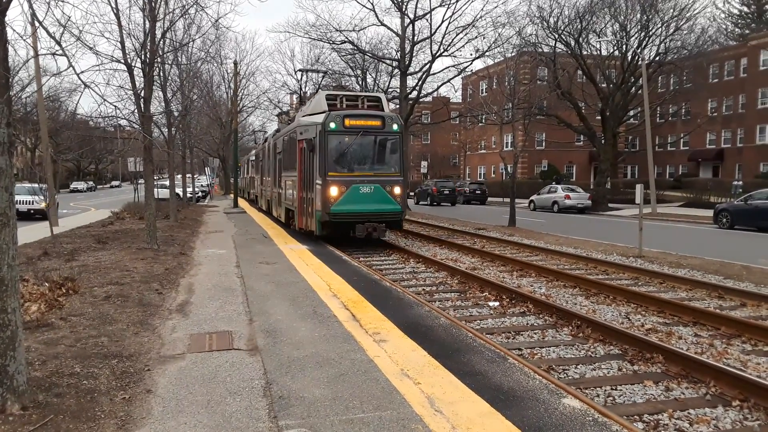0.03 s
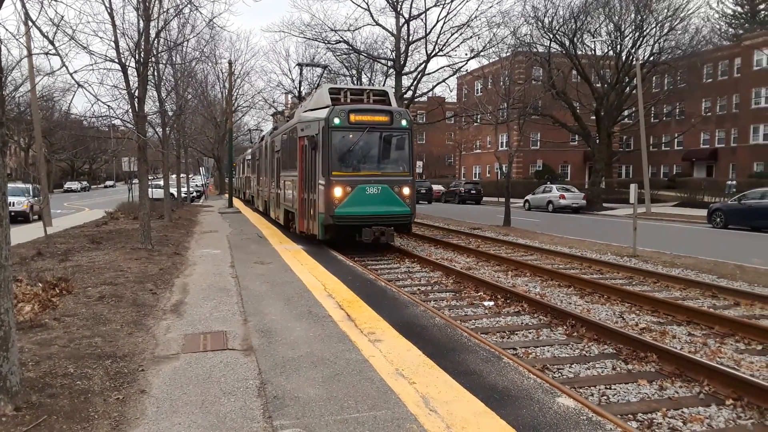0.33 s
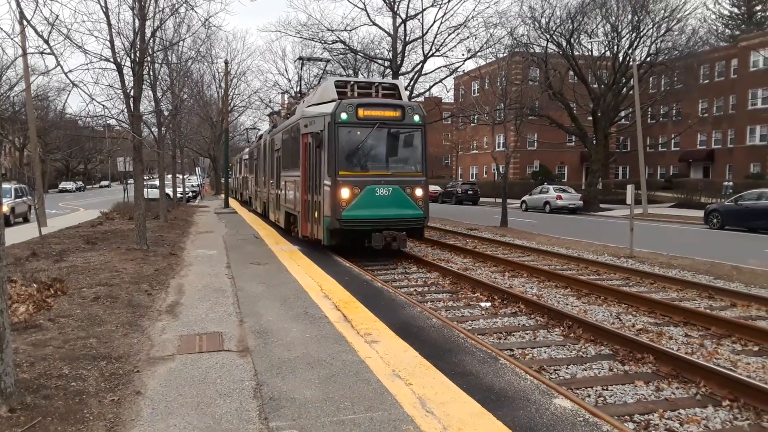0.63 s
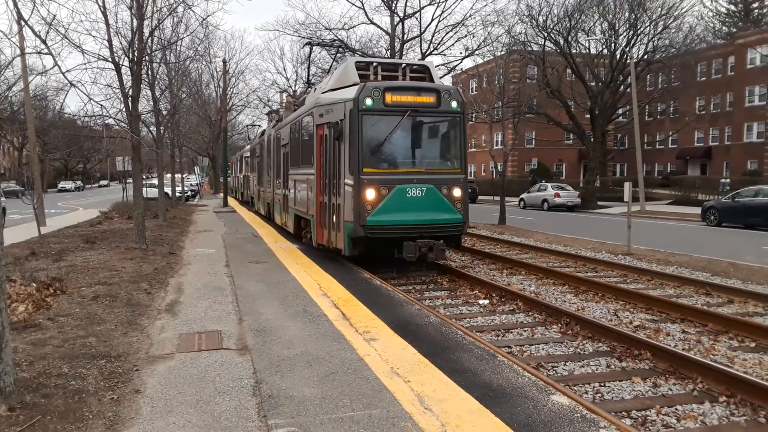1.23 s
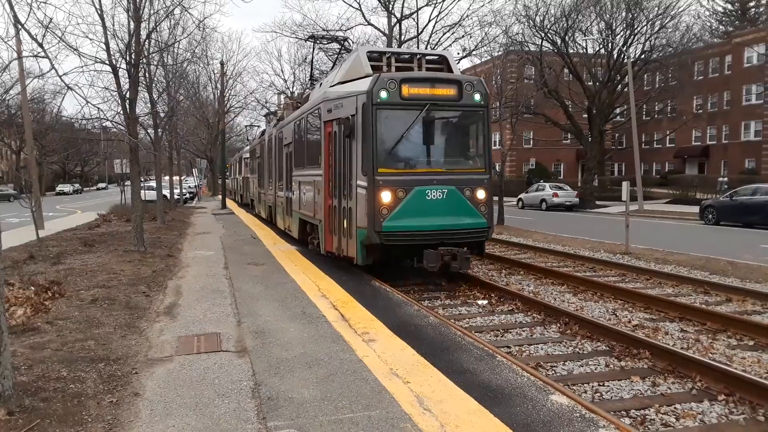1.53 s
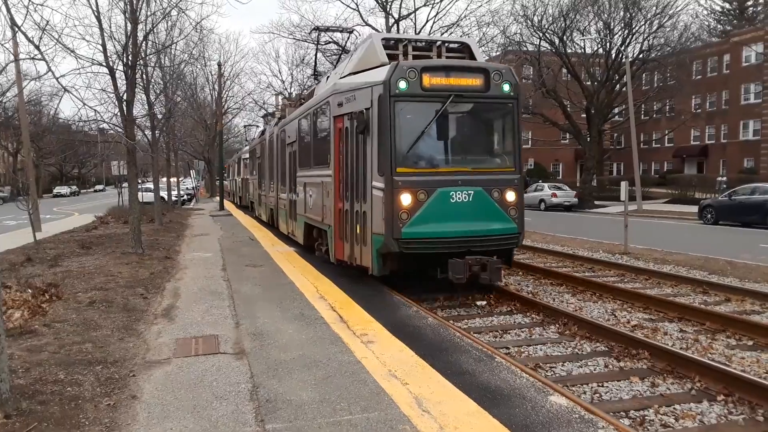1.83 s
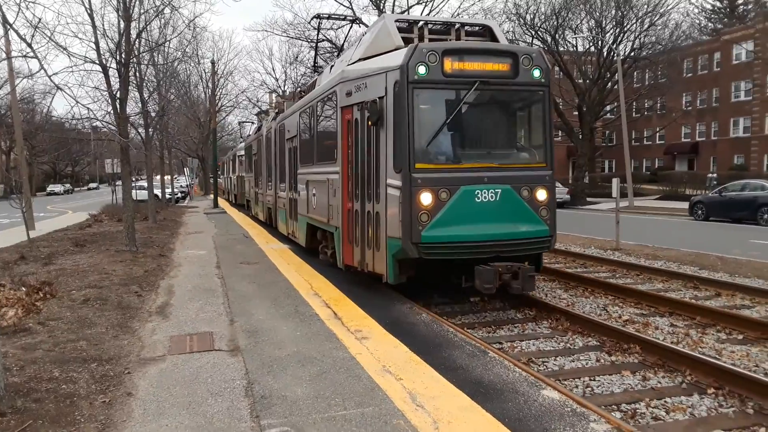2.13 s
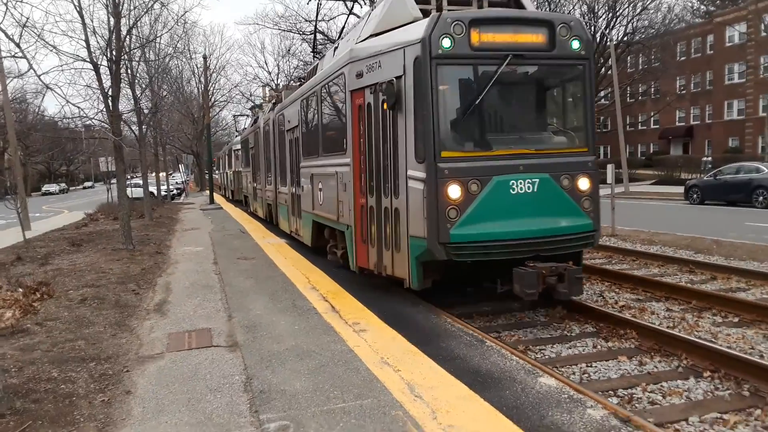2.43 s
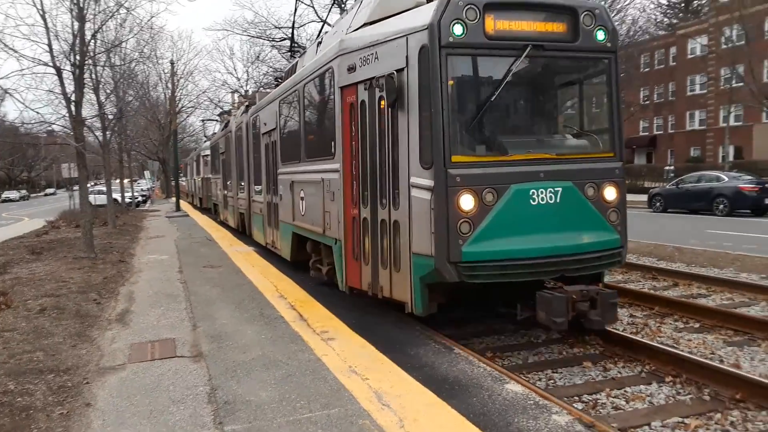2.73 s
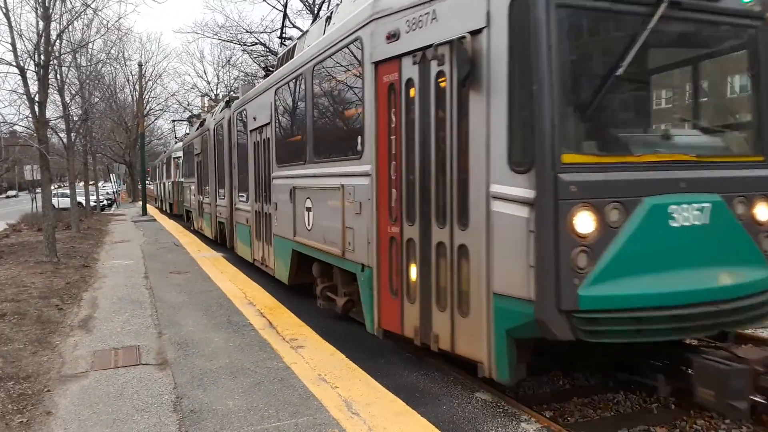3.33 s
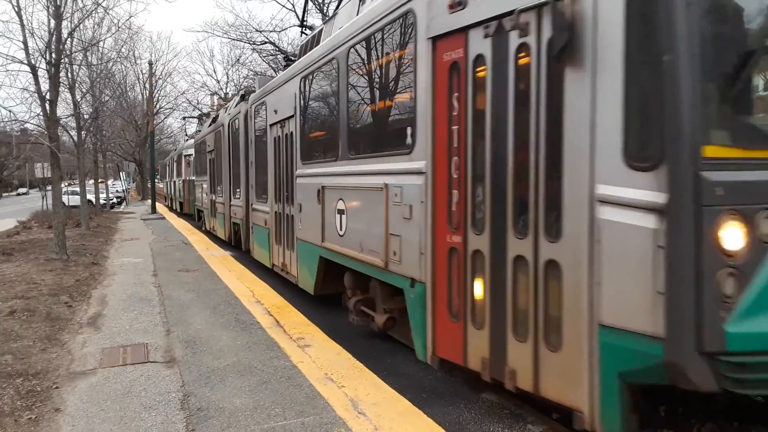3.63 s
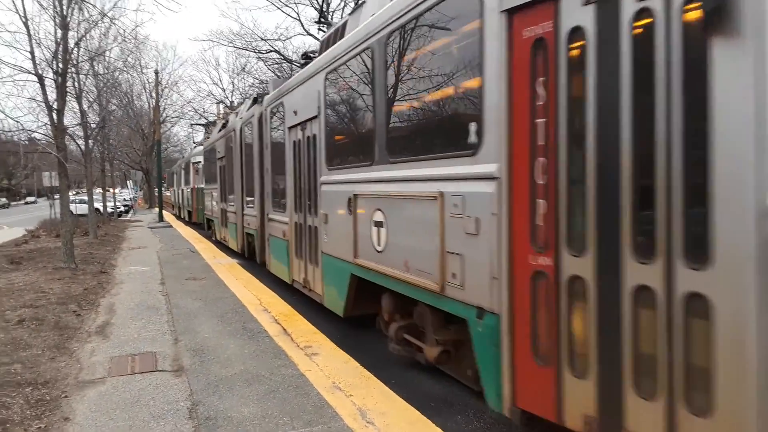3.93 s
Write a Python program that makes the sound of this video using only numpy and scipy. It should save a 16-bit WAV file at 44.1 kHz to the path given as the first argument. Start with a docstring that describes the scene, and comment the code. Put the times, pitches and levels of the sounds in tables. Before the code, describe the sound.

A light-rail train approaches a street platform with a steady low rumble and a high electric whine, while low hums swell and fade. A faint puff of brake air comes at about 0.7 seconds, and a sharper, thin one near 2.9. From about 2 seconds the whine flutters more. Higher whistles and hiss build from 3 to 4 seconds, with two tiny puffs, as the train draws level.

```python
"""Light-rail train drawing level with a platform.

The wheels rumble on a street track; the street's low hums come and go. The traction electronics whine
near 1 kHz, fluttering more and more as echoes beat with the direct tone. Higher whistles and hiss grow
as the train nears; the air brakes let out a few short, thin puffs."""
import sys
import numpy as np
from scipy import signal
from scipy.fft import rfft, irfft
from scipy.io import wavfile
from scipy.ndimage import uniform_filter1d

SR = 44100
rng = np.random.default_rng(int(sys.argv[2]) if len(sys.argv) > 2 else 0)


def generate_wav(signal):
    """Clip the signal to [-1, 1] and save it as 16-bit WAV at the path in sys.argv[1]."""
    frames = np.transpose(np.atleast_2d(signal))
    scaled = np.clip(frames, -1, 1) * 32767
    pcm = np.round(scaled).astype(np.int16)
    wavfile.write(sys.argv[1], SR, pcm)


N = 176400
SPEED_M_S, ABREAST_S, SIDE_M = 7.04, 3.9, 5.484

# Rolling noise density: f/Hz, far level/dB, near level/dB, L-R/dB
ROLLING_SPECTRUM = [(20, -102, -101, 0), (37, -90, -89, -0.5), (52, -61.5, -64, -0.5), (76, -65, -64, 0),
                    (103, -59.5, -58, 0), (170, -55.5, -55.5, 0), (265, -60, -57.5, 0),
                    (420, -65.5, -64, -1), (710, -64.5, -62.5, -1), (1236, -69.5, -68, -3.5),
                    (1740, -73.5, -72.5, -1), (2234, -77.5, -76.5, 1), (2780, -82.5, -80, 3.5),
                    (3350, -87, -83, 6), (3750, -89, -86.5, 6), (3930, -91.5, -85, 5),
                    (4670, -96.5, -91, -1), (5400, -102.5, -95.5, -3.5), (6620, -109, -100, -9),
                    (8260, -122, -116, -1.5), (13000, -119, -113, -3.5)]
# Rolling noise stereo image: f/Hz, L-R correlation
ROLLING_CORRELATION = [(30, 0.95), (150, .96), (290, 0.82), (640, 0.33), (1400, 0.13), (6000, 0.041)]
# Whine pitch: t/s, f/Hz
WHINE_GLIDE = [(0, 1010), (1, 1009.6), (2, 1008.8), (2.9, 1007.6), (3.5, 1007), (4, 1004)]
# Whine strength: t/s, direct level/dB, direct L-R/dB, echo level/dB
WHINE_ENVELOPE = [(0, -34, 3.5, -35.5), (.35, -31.5, 3.5, -34.5), (.7, -30.5, -11.5, -35.5),
                  (1.2, -28.5, -14, -35.5), (1.65, -25, -12, -35.5), (2.1, -25, -15, -34.5),
                  (2.4, -29.5, -1.5, -33), (2.9, -23, -6, -32.5), (2.96, -35, -9, -31),
                  (3.45, -28, -7, -29.5), (3.75, -29, -6, -28.5), (4, -33, -9, -30)]
# Flares and dips of the direct whine: t/s, half length/s, gain/dB
WHINE_FLARES = [(1.225, .015, 2.5), (2.06, .028, -12), (2.27, .025, -10), (2.47, .02, -8),
                (2.545, 0.015, 6), (2.675, .02, -12), (2.73, 0.0083, 4), (2.812, 0.031, 3.5),
                (3.311, 0.013, 9), (3.444, 0.038, 7), (3.55, .03, -12), (3.597, .014, 9),
                (3.712, 0.015, 15.5), (3.823, 0.011, 15.5), (3.976, .014, 15)]
# Drive whistles: f/Hz, half width/Hz, far level/dB, peak level/dB, peak t/s, half length/s, L-R/dB
DRIVE_WHISTLES = [(1445, 3, -54.5, -50.5, 3.2, 1.1, -4.5), (2016, 4, -51.5, -44.5, 3.7, .45, -3),
                  (2055, 5.5, -55, -54, 2.6, 1, 0), (2420, 3, -68.5, -56.5, 3.9, .6, 2.5),
                  (2468, 3, -68.5, -57, 4.4, .6, 2), (2513, 3, -67.5, -58.5, 3.9, .6, 2),
                  (2536, 3, -68, -59, 3.9, .6, 1.5), (2990, 8, -71, -51.5, 3.8, 0.92, 4.5),
                  (3056, 10, -65, -43, 3.7, .45, 6), (3085, 5, -67, -56.5, 3.6, 1.1, 4.5),
                  (3471, 6, -64, -45, 3.25, .35, 6), (3508, 4.6, -70, -60, 3.4, 1.1, 4.5),
                  (3581, 7.4, -66, -50, 3.7, 1.2, 5), (4513, 30, -82.5, -71, 4.3, 1, 0),
                  (5030, 30, -76.5, -68, 3.7, 1, 0), (6043, 14, -86.5, -67, 3.5, .8, -10),
                  (6470, 6, -96, -79, 3.3, .9, -9.5)]
# Low hums: peak t/s, half length/s, f/Hz, half width/Hz, level/dB
HUM_SWELLS = [(.1, .35, 66, 2, -40.5), (0.046, .25, 130, 1.8, -43.5), (0.81, .8, 177, 1.7, -42),
              (1.95, 0.2, 158, 4, -36.5), (2.53, .35, 157, 1.4, -35), (2.1, .6, 103, 10, -42.5),
              (2.65, .35, 662.9, 6.7, -43.5), (3.8, .4, 175, 2, -40), (3.7, .5, 300, 15, -40),
              (3.7, .3, 55, 6, -46)]
# Brake air: t/s, hold/s, T60/s, f/Hz, half width/Hz, level/dB, L-R/dB
BRAKE_PUFFS = [(.658, 0.058, .12, 11500, 450, -67, -3), (0.657, 0.049, .2, 5400, 1300, -60, -0.5),
               (2.86, .012, .17, 13800, 1900, -50, -9), (2.899, .1, .5, 13500, 1900, -70, -6.5),
               (3.333, .03, .2, 11400, 500, -76.5, -4), (3.838, .012, 0.3, 11550, 300, -75, -3)]


def amp(db):
    return 10 ** (np.asarray(db) / 20)


def unit_rms(x):
    return x / np.sqrt(np.mean(abs(x) ** 2) + 1e-20)


def time_s():
    return np.arange(N) / SR


def over_time(rows):
    """Table columns as curves in time."""
    t_s, *columns = np.transpose(rows)
    return [np.interp(time_s(), t_s, column) for column in columns]


def over_frequency(rows, hz):
    """Table columns interpolated in log frequency."""
    row_hz, *columns = np.transpose(rows)
    return [np.interp(np.log(hz + 1), np.log(row_hz), column) for column in columns]


def pan(side_db):
    """Constant-power L, R gains."""
    half_db = np.atleast_1d(side_db) / 2
    gains = amp([half_db, -half_db])
    return gains / np.sqrt(np.mean(gains ** 2, 0))


def stereo_pair(a, b, correlation):
    """Correlated L, R from two independent noises."""
    c = np.clip(correlation, -1, 1)
    return np.array([a, c * a + np.sqrt(1 - c ** 2) * b])


def flutter(width_hz, correlation, size=4096):
    """Random L, R drift of gain and phase, as from many moving echoes."""
    step = 100  # samples per control point
    hz = np.fft.fftfreq(size, step / SR)
    phasors = np.exp(2j * np.pi * rng.random((2, size)))
    drifts = np.fft.ifft(phasors / (1 + (hz / width_hz) ** 2) ** 0.79)
    a, b = (unit_rms(np.interp(np.arange(N) / step, np.arange(size), row)) for row in drifts)
    return stereo_pair(a, b, correlation)


def tone(hz, gain):
    """Unit-rms sine times a complex gain."""
    return np.sqrt(2) * (gain * np.exp(2j * np.pi * np.cumsum(hz * np.ones(N)) / SR)).real


def nearness(t_s):
    """Log-distance scale: 0 at the start, 1 abreast."""
    far_m = np.hypot(SPEED_M_S * ABREAST_S, SIDE_M)
    now_m = np.hypot(SPEED_M_S * (ABREAST_S - t_s), SIDE_M)
    return np.log(far_m / now_m) / np.log(far_m / SIDE_M)


def rolling(patch_db=1.23, swell_db=.5):
    """Wheels, rails and fans: rumble with drifting patches, brighter as the train nears."""
    size, hop = 2048, 512
    frames, hz = N // hop + 5, np.fft.rfftfreq(size, 1 / SR)
    a, b, c, d, patches = rng.standard_normal((5, frames, len(hz)))
    patches = unit_rms(uniform_filter1d(uniform_filter1d(patches, size=8, axis=0), size=16, axis=1))
    swell = unit_rms(uniform_filter1d(rng.standard_normal(frames), size=20))[:, None]
    far_db, near_db, side_db = over_frequency(ROLLING_SPECTRUM, hz)
    near = nearness(np.arange(frames) * hop / SR)[:, None]
    level_db = far_db + (near_db - far_db) * near + patch_db * patches + swell_db * swell
    noise = stereo_pair(a + 1j * b, c + 1j * d, over_frequency(ROLLING_CORRELATION, hz)[0])
    spectra = noise * amp(level_db) * pan(side_db)[:, None]
    _, rumble = signal.istft(spectra.transpose(0, 2, 1), nperseg=size, noverlap=size - hop)
    return rumble[:, :N] * np.sqrt(SR / hop * 3 / 8)


def traction_whine(throb_hz=29.57, left_delay_s=0.00021, echo_shift_hz=4.986, rear_shift_hz=26):
    """Throbbing drive tone, beating with echoes shifted down by the motion."""
    t, (hz,) = time_s(), over_time(WHINE_GLIDE)
    direct_db, side_db, echo_db = over_time(WHINE_ENVELOPE)
    delay = np.exp(-2j * np.pi * hz * np.array([[left_delay_s], [0]]))
    flare = 1 + sum((amp(db) - 1) * np.exp(-((t - at_s) / half_s) ** 2)
                    for at_s, half_s, db in WHINE_FLARES)
    wobble_db = 2.2 * unit_rms(flutter(width_hz=12, correlation=1)[0].real)
    throb = 1 + 0.16 * np.sin(2 * np.pi * throb_hz * t)
    direct = amp(direct_db + wobble_db) * pan(side_db) * flare * throb * tone(hz, delay)

    near = np.clip(nearness(t), 0, 1)
    far_drift, near_drift, rear_drift = (flutter(width_hz, correlation=0.38) for width_hz in (13, 20, 5))
    drift = np.sqrt(1 - near) * far_drift + np.sqrt(near) * near_drift
    echo = tone(hz - echo_shift_hz * near, drift)
    rear_echo = amp(-4.5) * near * tone(hz - rear_shift_hz, rear_drift)
    return direct + amp(echo_db) * pan(side_db=-4) * (echo + rear_echo)


def drive_whistle(hz, width_hz, far_db, peak_db, peak_s, half_s, side_db, direct_to_echo=.65):
    """Thin wavering tone, swelling as its part of the train comes by."""
    level_db = far_db + (peak_db - far_db) / (1 + ((time_s() - peak_s) / half_s) ** 2)
    waver = unit_rms(direct_to_echo + flutter(width_hz, correlation=0.34))
    return amp(level_db) * pan(side_db) * tone(hz, waver)


def hum(peak_s, half_s, hz, width_hz, level_db):
    """Low tone that swells and fades in the rumble."""
    swell = np.exp(-((time_s() - peak_s) / half_s) ** 2)
    return amp(level_db) * swell * tone(hz, flutter(width_hz, correlation=0.99))


def brake_puff(start_s, hold_s, t60_s, centre_hz, width_hz, level_db, side_db, attack_s=.003):
    """A brake valve opens sharply; the air hisses and dies away."""
    age_s, hz = time_s() - start_s, np.fft.rfftfreq(N, 1 / SR)
    band = 1 / (1 + abs((hz - centre_hz) / width_hz) ** 3)
    air = unit_rms(irfft(rfft(rng.standard_normal((2, N))) * band, N))
    attack = np.clip(age_s / attack_s, 0, 1)
    decay_db = 60 * np.maximum(age_s - hold_s, 0) / t60_s
    return air * pan(side_db) * attack * amp(level_db - decay_db)


def scene():
    """The nearing train and the street's low hums, in stereo."""
    return (rolling() + traction_whine()
            + sum(drive_whistle(*row) for row in DRIVE_WHISTLES)
            + sum(hum(*row) for row in HUM_SWELLS)
            + sum(brake_puff(*row) for row in BRAKE_PUFFS))


def record(dry, cutoff_hz=15800):
    """Steep low-pass."""
    taps = signal.firwin(511, cutoff_hz, window=("kaiser", 9), fs=SR)
    return signal.oaconvolve(dry, taps[None], "same")


dry = scene()
out = record(dry)
generate_wav(out)
```